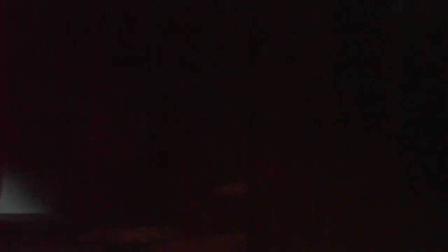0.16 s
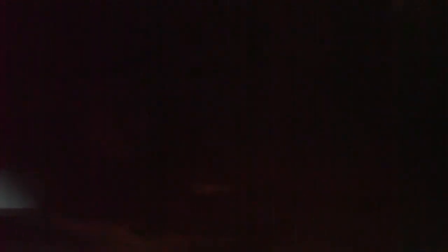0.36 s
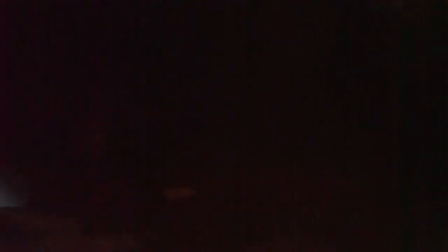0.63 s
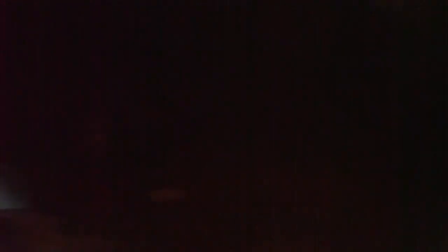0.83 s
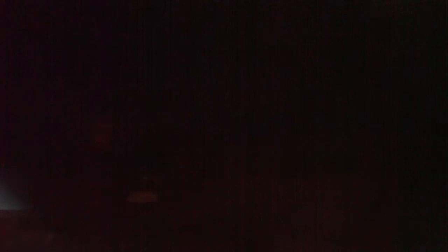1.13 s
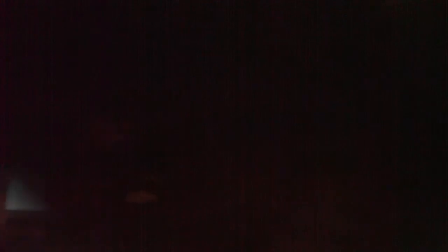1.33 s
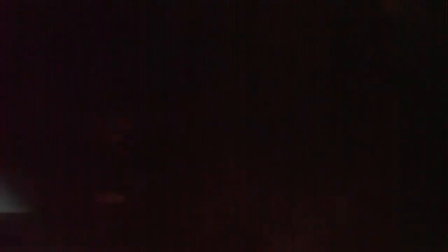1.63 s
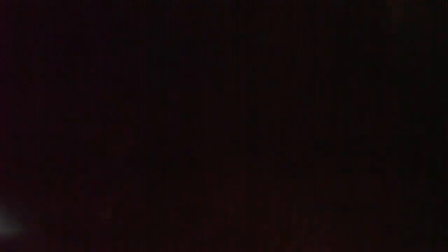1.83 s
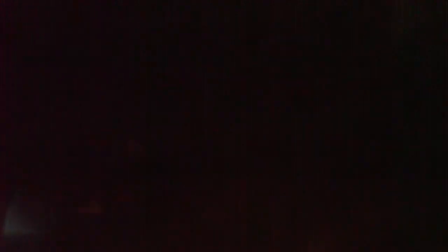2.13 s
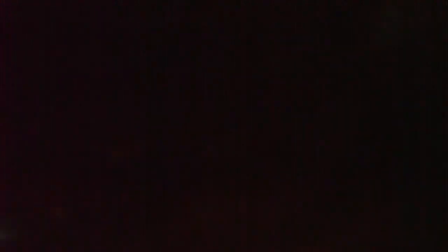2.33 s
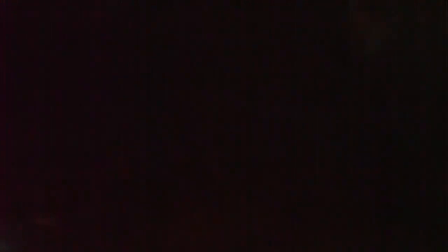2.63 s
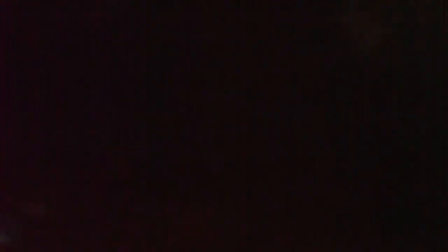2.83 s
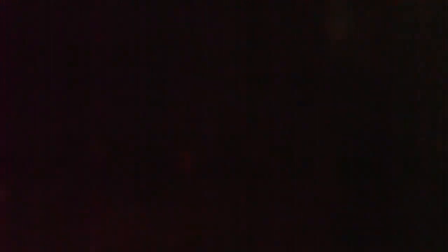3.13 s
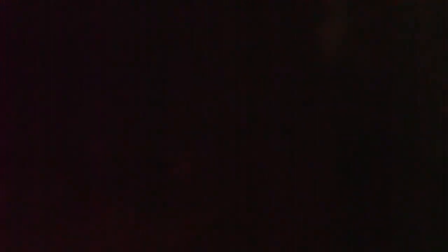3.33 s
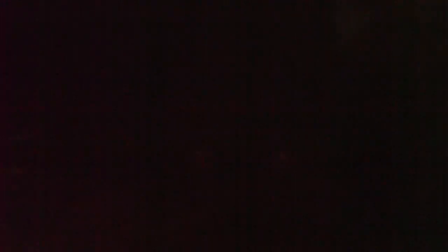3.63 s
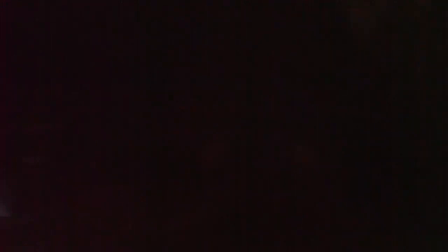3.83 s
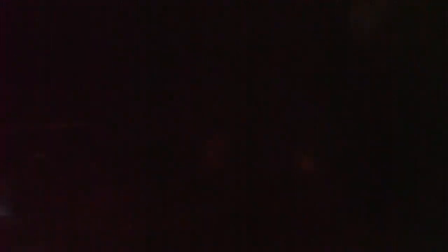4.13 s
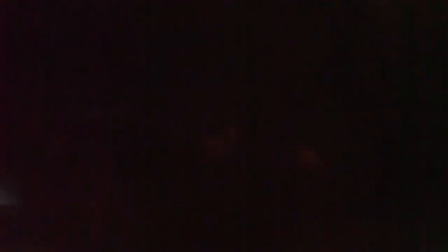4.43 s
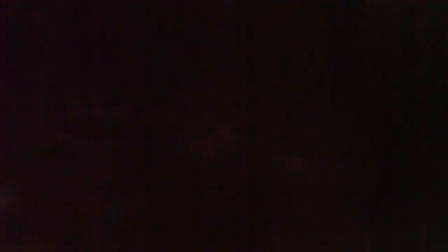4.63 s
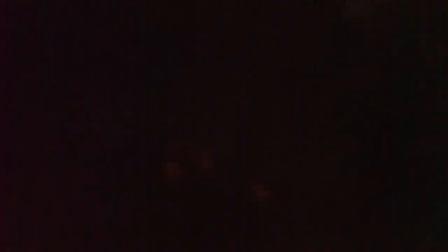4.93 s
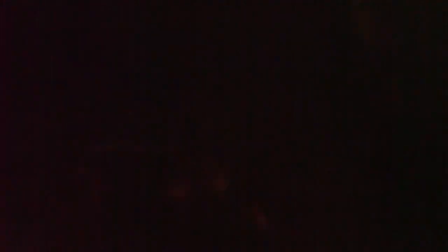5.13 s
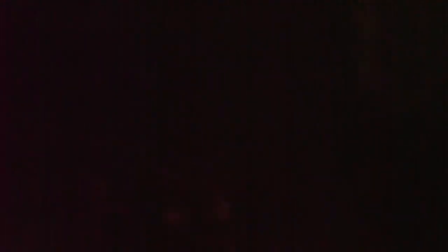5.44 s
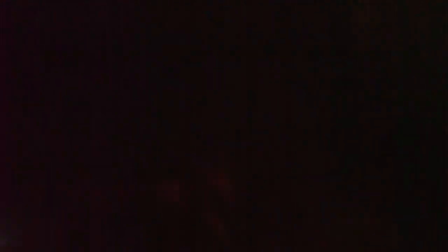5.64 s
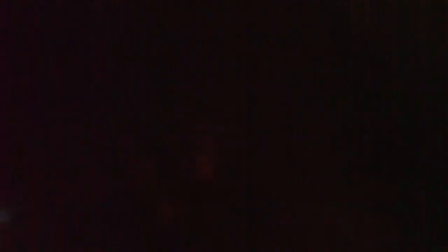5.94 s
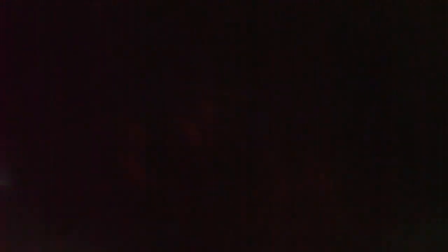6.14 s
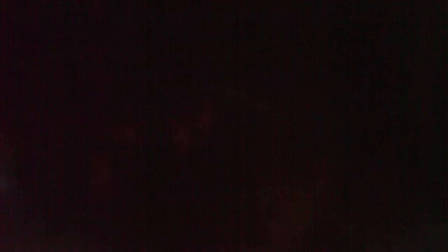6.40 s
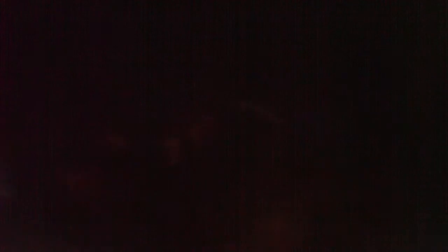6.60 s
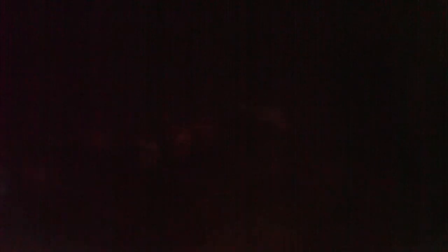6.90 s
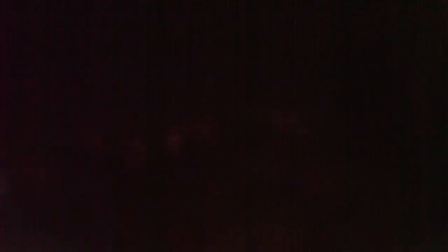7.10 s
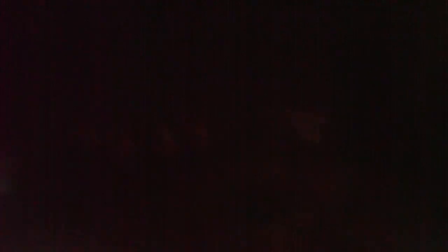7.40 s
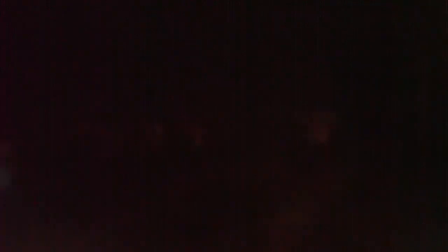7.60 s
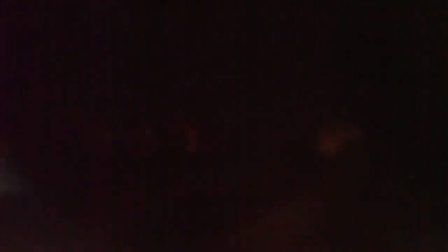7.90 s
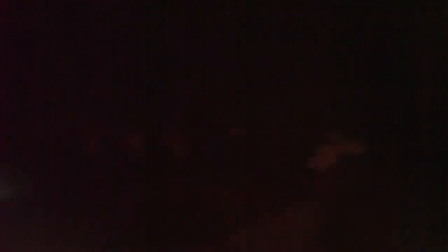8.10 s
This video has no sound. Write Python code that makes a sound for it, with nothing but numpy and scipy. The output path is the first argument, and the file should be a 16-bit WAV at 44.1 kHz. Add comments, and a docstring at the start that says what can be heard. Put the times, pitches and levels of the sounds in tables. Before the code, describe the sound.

Throughout about 8.4 seconds, a microwave oven runs close to a small hand-held microphone: a steady low electrical hum, a droning fan whose low tone dominates, and dull rushing air with slight gusts and little high treble. Faint finger rubs on the housing occur at 0, 2.1 and 2.4 s. A hard knock with a short rattle and low thump lands at 2.8 s, a softer one at 3.8 s. A light rub at 4.5 s precedes a cluster from 4.8 to 5.1 s: rattling knocks, tiny clicks, then a very loud, nearly overloading crack with a deep bump at 5.08 s. Grainy scrapes follow to 5.7 s, with a small knock at 5.7. Another dense flurry of sharp clicks, dry rubbing and thumps fills 5.9 to 6.2 s. One lighter dull knock comes at 6.9 s; then only the unchanged hum and airflow remain until the end.

```python
"""Beside a running microwave oven, a small hand-held microphone picks up its hum, fan tones and rushing air.
Hum and fan are sums of sinusoids on two slightly drifting speeds; the air is shaped, patchy noise.
Fingers rub the microphone's housing in short strokes of grainy noise. Hard clicks and dull knocks are
impulses and decaying rattles heard through a springy contact and the modes of the housing.
The baseline jumps near some of them: the signal's offset steps, steps partly back, and decays to zero."""
import sys
import numpy as np
from scipy import signal
from scipy.fft import rfft, irfft, next_fast_len
from scipy.io import wavfile
from scipy.ndimage import uniform_filter1d, map_coordinates

SR = 44100
rng = np.random.default_rng(int(sys.argv[2]) if len(sys.argv) > 2 else 0)


def dump_mix(stems):
    """Bounce the given channels to the path in sys.argv[1] as a 16-bit WAV at rate SR."""
    frames = np.atleast_2d(stems).T  # one column per channel
    limited = np.clip(frames, -1, 1)  # hard clip at full scale
    pcm = np.round(limited * 32767).astype(np.int16)
    wavfile.write(sys.argv[1], SR, pcm)


def ratio_of_db(decibels):
    """Turn decibels (scalar or array-like) into linear amplitude factors; 0 dB maps to 1."""
    return 10 ** (np.asarray(decibels, float) / 20)


N = 364266

MAINS_HZ, SHAFT_HZ = 59.985, 40.31
# Transformer hum. Each row: multiple of the mains frequency, mean level in dB rms.
HUM_PARTIALS = [(2, -44.5), (4, -48.5), (6, -47.5), (8, -61.5), (10, -66), (11, -55.5), (12, -68),
                (14, -77), (50, -77), (51, -84), (53, -82.5)]
# Four-blade fan. Each row: multiple of the shaft speed, level in dB rms.
FAN_PARTIALS = [(2, -51.5), (4, -39), (8, -54.5), (12, -66.5), (15, -57), (16, -65), (17, -61), (18, -62.5),
                (20, -57), (21, -84), (24, -61.5)]
# Spectrum of the rushing air. Each row: frequency in Hz, relative density in dB per Hz.
AIR_SPECTRUM = [(20, -9), (45, -8), (200, -3), (390, -8.5), (470, -18), (560, -15.5), (1150, -16),
                (1270, -25), (1750, -19), (1900, -27.5), (2500, -32.5), (3600, -38.5), (5000, -43.5),
                (6500, -55), (7400, -66.5)]
AIR_DB = -36  # rms level about which the gusts vary
# Cabinet resonances in the air noise. Each row: centre in Hz, width in Hz, lift in dB.
CABINET_RESONANCES = [(56.6, 26, 7), (77, 17, 4), (150, 17, 6.5), (307.6, 31, 4.5), (362, 30, 3.5),
                      (603.4, 114, 8.5), (757, 41, 7.5), (1017, 170, 2.5), (1372, 133, 10.5),
                      (1590, 210, 3.5), (2200, 250, 6)]

# Finger strokes. Each row: start in seconds, length in seconds, level in dB before the two colours
# are weighted, dryness from 0 to 1.
FINGER_STROKES = [(0, .05, -45, 0.4), (2.099, .06, -44.5, 0.4), (2.422, .06, -43, .35),
                  (2.88, .05, -52, .5), (4.466, .06, -48.5, 0.4), (5.0, 0.035, -38.5, 0.4),
                  (5.095, 0.061, -46.5, .4), (5.167, .015, -35.5, .4), (5.191, .035, -32.5, 0.46),
                  (5.275, .02, -42, 0.1), (5.351, .05, -47, .4), (5.406, .1, -40, 0), (5.544, .07, -51, 0),
                  (5.641, 0.1, -42, 0.3), (5.892, 0.014, -42.5, 0.7), (5.912, 0.032, -32, 0.8),
                  (5.957, .02, -43, 0.4), (6.026, 0.12, -48.5, 0.3), (6.156, 0.059, -46.5, 0.4)]
# Colour of a pressed stroke. Each row: frequency in Hz, relative density in dB per Hz.
PRESSED_COLOUR = [(200, -14), (600, -3.5), (1000, 2.5), (1400, 1), (2000, -9), (3000, -12.5), (4300, -23),
                  (6000, -31), (7500, -50.5)]
# Colour of a dry, light stroke. Each row: frequency in Hz, relative density in dB per Hz.
DRY_COLOUR = [(500, -16.5), (1200, -2.5), (2200, 1), (3000, -2), (4300, -8.5), (5700, -8.5), (6800, -27),
              (7500, -29)]
RISE, FADE = 0.35, 0.3  # rise, centred on the start, and fade time constant, as shares of stroke length

# Blows. Each row: time in seconds, force in dB, contact pitch in Hz, rattle level in dB relative to
# the strike before its onset ramp, rattle decay time to -60 dB in seconds.
BLOW_EVENTS = [(2.7702, 8, 482, -13.5, 0.087), (3.815, 2.5, 405, -11, .1), (4.821, -0.5, 534, -12.5, 0.46),
               (4.829, -2, 640, -16, 0.17), (4.871, 4.5, 538, -27, 0.038), (4.912, -12.5, 2520, -26, .02),
               (5.002, -6, 2900, -29, .012), (5.01, -4, 2430, -24, .02), (5.055, 4, 1295, -36, .009),
               (5.073, 3.5, 1294, -15.5, 0.033), (5.0783, 24, 1400, -40, 0.0082),
               (5.0789, 11.5, 2900, -39, .006), (5.099, -6, 2900, -27, .007),
               (5.132, -3.5, 2370, -26, 0.036), (5.417, -14, 2950, -20, 0.027),
               (5.689, 4.5, 810, -22.5, .023), (5.893, 12, 940, -13.5, .02),
               (5.9101, 9.5, 2330, -21.5, 0.054), (5.9107, 13.5, 1880, -21, .06),
               (5.915, 8, 492, -13.5, 0.22), (5.933, 8.5, 1500, -22, .04), (5.96, 8.5, 1790, -27, 0.026),
               (5.965, -1.5, 2200, -24.5, .02), (5.969, 7, 1900, -19.5, 0.046),
               (6.052, -7, 2490, -22, 0.13), (6.0955, 10.5, 1460, -22.5, 0.068),
               (6.0965, 8.5, 2330, -16.5, .025), (6.099, 7, 600, -12, .1), (6.861, 2.5, 616, -17, .1)]
# Broad modes of the struck housing. Each row: centre in Hz, width in Hz, mean gain in dB.
HOUSING_MODES = [(348, 152, -1), (600, 160, -13), (950, 440, -0.5), (1500, 330, -14.5), (2357, 130, -1.5),
                 (2830, 270, -6.5), (3950, 300, -13.5), (5550, 390, -14), (7500, 700, -26.5)]
RING_HZ, RING_WIDTH_HZ = 1350, 110
RING_DB, RING_GROWS = -11.5, 0.66  # ring gain for a 0 dB blow; dB gained per dB of blow
DULL_HZ = 6000  # corner of the housing wall's treble loss
RATTLE_RISE_S = 0.0027  # time constant

# Jumps of the signal's offset. Each row: start in seconds, step size as a share of full scale,
# time from start to the step back in seconds, duration of the step back in seconds.
BASELINE_JUMPS = [(2.771, 0.064, .077, .002), (4.826, 0.056, .087, 0.0017), (5.079, .2, .01, .015),
                  (5.892, 0.055, 0.046, 0.0082), (5.911, .12, .085, .002), (6.096, 0.077, .03, 0.0017),
                  (6.098, .05, 0.053, 0.0046)]
JUMP_S, STEP_BACK = 0.0014, 0.65  # duration of the first step; size of the step back over the first


def unit(x):
    """Normalization: scale a signal to rms 1."""
    return x / np.sqrt(np.mean(x ** 2) + 1e-20)


def along(points, hz):
    """Interpolation: read (Hz, value) points on a logarithmic frequency axis."""
    f, v = np.transpose(points)
    return np.interp(np.log(hz + 1), np.log(f + 1), v)


def wobble(rate):
    """Slow random variation: a smooth curve through random knots, rate of them a second."""
    knots = rng.standard_normal(int(N * rate / SR) + 4)
    return map_coordinates(knots, [np.arange(N) * rate / SR])


def filtered(x, response):
    """Linear filtering: multiply the spectrum by a complex response of frequency."""
    m = next_fast_len(len(x) + 8192)
    spectrum = rfft(x, m) * response(np.fft.rfftfreq(m, 1 / SR))
    return irfft(spectrum, m)[..., :len(x)]


def patchy(patchy_db, bins, frames):
    """Non-stationary noise: white noise with a random gain field over pitch and time."""
    z = signal.stft(rng.standard_normal(N), nperseg=512)[2]
    field = uniform_filter1d(rng.standard_normal(z.shape), size=bins, axis=0)
    field = uniform_filter1d(field, size=frames, axis=1)
    return signal.istft(z * ratio_of_db(patchy_db * unit(field)), nperseg=512)[1][:N]


def resonance(f, centre, width):
    """Damped oscillation: a band-pass response of gain 1 at its centre."""
    damping = 1j * f * width
    return damping / (centre ** 2 - f ** 2 + damping)


def tones(rows, base_hz, drift, sway_db=0.0, sway_rate=1.0):
    """Harmonic synthesis: multiples of one drifting speed, each swaying by sway_db in level."""
    turns = 2 * np.pi * np.cumsum(base_hz * (1 + drift * wobble(0.7))) / SR
    total = np.zeros(N)
    for multiple, db in rows:
        peak = np.sqrt(2) * ratio_of_db(db + sway_db * wobble(sway_rate))
        total += peak * np.sin(multiple * turns + rng.uniform(0, 2 * np.pi))
    return total


def transformer_hum():
    """Mains excitation: the transformer sounds at multiples of the mains frequency."""
    return tones(HUM_PARTIALS, MAINS_HZ, drift=0.00005, sway_db=1.0, sway_rate=0.848)


def fan_tones():
    """Rotation: the fan sounds at multiples of its drifting shaft speed, at steady levels."""
    return tones(FAN_PARTIALS, SHAFT_HZ, drift=0.00053)


def rushing_air(gust_db=1.0):
    """Turbulence in a cavity: patchy noise is lifted at the metal cabinet's resonances."""
    def response(hz):
        lift = sum(db / (1 + (2 * (hz - c) / w) ** 2) for c, w, db in CABINET_RESONANCES)
        return ratio_of_db(along(AIR_SPECTRUM, hz) + lift)

    noise = filtered(patchy(0.89, bins=4, frames=10), response)
    return ratio_of_db(AIR_DB + gust_db * wobble(2.912)) * unit(noise)


def finger_rub(grain_db=3.5):
    """Stick-slip friction: skin on the housing makes grainy noise between a pressed and a dry colour."""
    t = np.arange(N) / SR
    weights = np.zeros((2, N))
    for start, length, db, dryness in FINGER_STROKES:
        rise = np.clip((t - start) / (RISE * length) + 0.5, 0, 1)
        fade = np.exp(-np.clip(t - start - length, 0, None) / (FADE * length))
        weights += ratio_of_db(db) * np.outer([1 - dryness, dryness ** 2], rise * fade)
    roughness = ratio_of_db(grain_db * wobble(400) + 0.57 * wobble(60))
    grains = roughness * patchy(2.5, bins=8, frames=6)
    pressed = unit(filtered(grains, lambda hz: ratio_of_db(along(PRESSED_COLOUR, hz))))
    dry_rub = unit(filtered(grains, lambda hz: ratio_of_db(along(DRY_COLOUR, hz))))
    return weights[0] * pressed + weights[1] * dry_rub


def contact_force(contact_hz, rattle_db, t60, spiky=0.93):
    """Impact: a soft pull, a sharp strike and a dying rattle of small contacts."""
    t = np.arange(SR // 4) / SR
    knocks = rng.standard_normal(len(t))
    knocks = unit(knocks * np.abs(knocks) ** spiky)
    force = ratio_of_db(rattle_db - 60 * t / t60) * knocks * (1 - np.exp(-t / RATTLE_RISE_S))
    swing = round(SR / contact_hz / 2)  # half a period of the contact
    force[:swing] -= 0.62 * np.hanning(swing) / swing  # pull
    force[swing] += 1  # strike
    return force


def blows(scatter_db=2, springiness=1.74):
    """Modal excitation: each force passes through a springy contact into the resonant housing."""
    out = np.zeros(N + SR)
    for start, db, contact_hz, rattle_db, t60 in BLOW_EVENTS:
        force = contact_force(contact_hz, rattle_db, t60)
        spread = rng.normal(0, scatter_db, len(HOUSING_MODES))  # dB, new for every blow

        def response(f):
            modes = sum(ratio_of_db(gain + extra) * resonance(f, centre, width)
                        for (centre, width, gain), extra in zip(HOUSING_MODES, spread))
            # harder blows wake the narrow ring more
            ring = ratio_of_db(RING_DB + RING_GROWS * db) * resonance(f, RING_HZ, RING_WIDTH_HZ)
            # the contact favours its own pitch and dulls what lies above
            contact = 1 / (1 - (f / contact_hz) ** 2 + 1j * f / (contact_hz * springiness))
            return (modes + ring) * contact / (1 + 1j * f / DULL_HZ) ** 2

        out[round(start * SR):][:len(force)] += ratio_of_db(db) * filtered(force, response)
    return out[:N]


def baseline_jumps(decay_s=0.05):
    """Exponential decay: the signal's offset steps, steps partly back, and decays to zero."""
    t = np.arange(N) / SR
    offset = np.zeros(N)
    for start, size, held, back_s in BASELINE_JUMPS:
        step = np.clip((t - start) / JUMP_S, 0, 1)
        step_back = np.clip((t - start - held) / back_s, 0, 1)
        offset += size * (step - STEP_BACK * step_back)
    kept = np.exp(-1 / (decay_s * SR))  # share kept each sample
    return signal.lfilter([1, -1], [1, -kept], offset)


def scene():
    """Superposition: the oven's sounds, the rubs and blows on the housing and the baseline jumps add."""
    oven = transformer_hum() + fan_tones() + rushing_air()
    handling = finger_rub() + blows()
    return (oven + handling + baseline_jumps())[None]


def top_cut(x):
    """Nothing passes above the cut-off."""
    return signal.sosfilt(signal.butter(12, 7200, fs=SR, output="sos"), x)


def record(dry):
    """Saturation: the input bends smoothly towards a limit of 1.07 times full scale."""
    clipped = dry / (1 + np.abs(dry / 1.07) ** 12) ** (1 / 12)
    return top_cut(clipped)


dry = scene()
out = record(dry)
dump_mix(out)
```